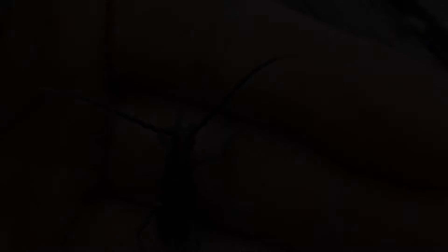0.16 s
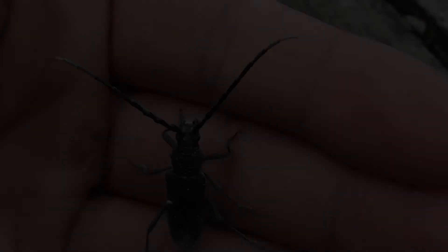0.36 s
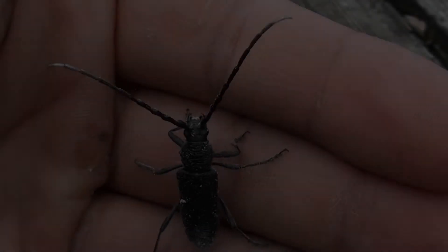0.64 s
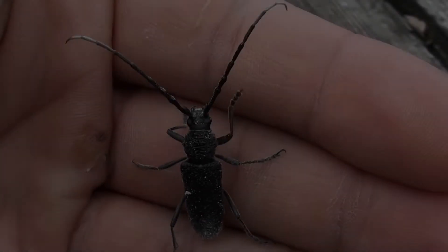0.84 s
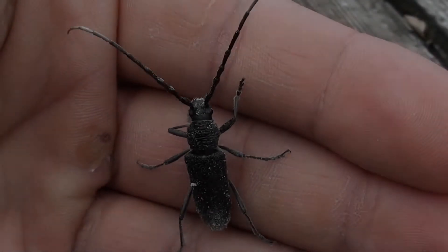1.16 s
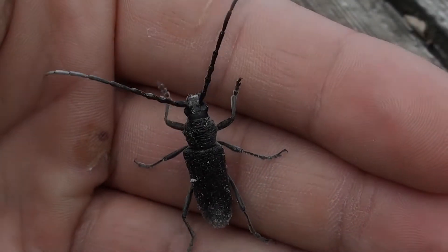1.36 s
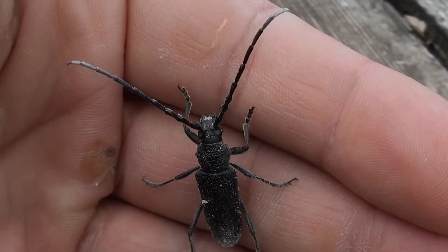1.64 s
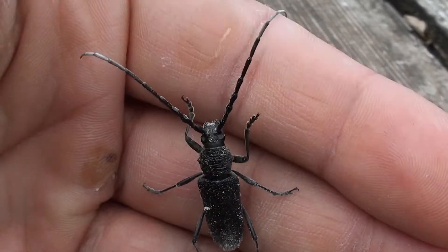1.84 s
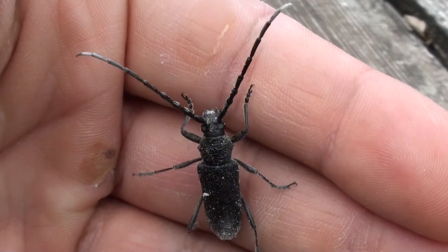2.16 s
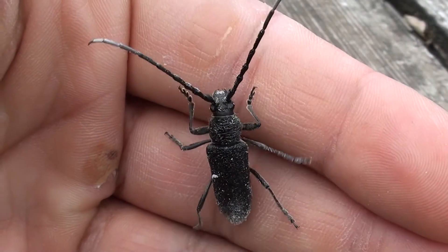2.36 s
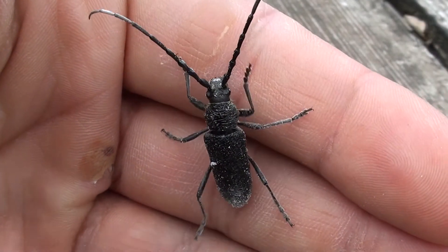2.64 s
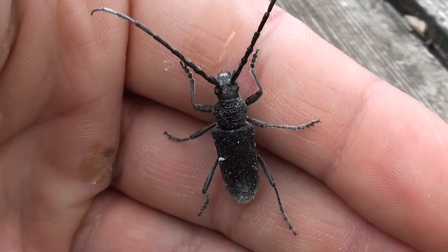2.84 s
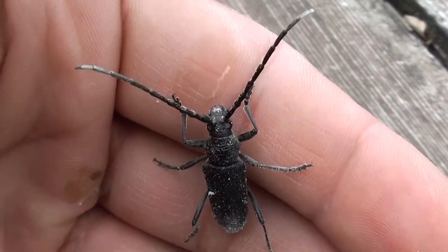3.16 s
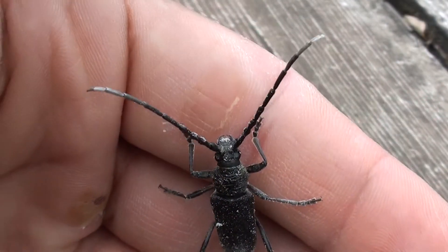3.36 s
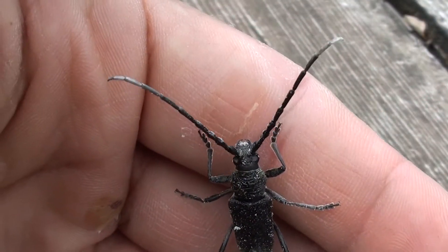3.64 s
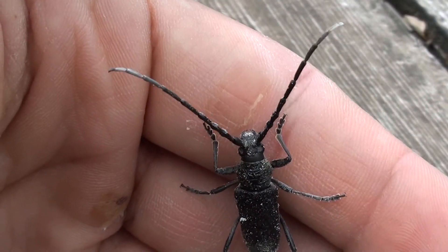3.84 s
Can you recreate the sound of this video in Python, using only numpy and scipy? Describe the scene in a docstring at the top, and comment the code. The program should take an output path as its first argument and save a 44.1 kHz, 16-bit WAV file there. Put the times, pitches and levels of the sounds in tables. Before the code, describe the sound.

Close, dry beetle stridulation fades in outdoors: rapid bright zipping squeaks in soft-loud pairs, a little slower and less regular midway, with distant bird whistles, steady low background noise and one faint hollow knock.

```python
"""The whole scene fades in together: a faint outdoor hush, far-off bird whistles and, close by, the squeaks
of a hand-held beetle. Hush: shaped stereo noise. Birds: gliding near-sines with a diffuse echo.
Beetle (stridulation): nodding draws a scraper over a file of ridges, a quiet slow back stroke, then a loud forward
stroke; each is a train of sharp ticks that speeds up and slows down, coloured by the body.
Later come one hollow knock (damped modes) and soft handling bumps (band-passed noise puffs)."""
import sys
import numpy as np
from scipy import signal
from scipy.fft import rfft, irfft
from scipy.io import wavfile

SR = 44100
rng = np.random.default_rng(int(sys.argv[2]) if len(sys.argv) > 2 else 0)


def bounce(signal):
    """Save signal as a 16-bit WAV file at the path given by the first command-line argument."""
    frames = np.transpose(np.atleast_2d(signal))
    limited = np.clip(frames, -1, 1)
    pcm = np.round(limited * 32767).astype(np.int16)
    wavfile.write(sys.argv[1], SR, pcm)


N = 176400
TIME = np.arange(N) / SR

# All levels are relative, ahead of the group gains and the fade.
# hush spectrum: (f/Hz, density level/dB)
HUSH_SPECTRUM = [(25, -20), (65, -7), (170, -1.5), (330, -2.5), (650, -1), (1000, -0.5), (1700, -4.5),
                 (3200, -5.5), (5000, -7.5), (8500, -14), (14500, -16.5), (16000, -17)]
# slow level of the low hush: (t/s, level/dB)
LOW_HUSH_LEVEL = [(0, -9.5), (.4, -1.5), (.65, -2), (1.0, -1.5), (1.6, -.5), (2.3, 1), (3.2, -.5), (4, 1.5)]
# likeness of the left and right hush: (f/Hz, left-right correlation)
EAR_CORRELATION = [(40, 0.81), (125, 1), (250, .55), (550, 0.5), (1100, 0.56), (2500, 0.74), (5000, 0.84),
                   (9000, 0.97), (14000, 1)]
HUSH_DB, HUSH_SPLIT_HZ = -51, 1800

# bird whistles: (t/s, duration/s, start f/Hz, middle f/Hz, end f/Hz, level/dB)
BIRD_WHISTLES = [(.12, 0.12, 2200, 2170, 2020, -57), (.22, 0.072, 3300, 3180, 3050, -50),
                 (.29, 0.138, 1970, 1858, 1870, -48), (0.273, 0.16, 2600, 2530, 2350, -52.5),
                 (.51, .07, 3115, 3370, 3530, -45.5), (.565, 0.05, 3585, 3625, 3590, -39.5),
                 (.67, .08, 3000, 2950, 2960, -48), (.81, 0.072, 3190, 3357, 3650, -44),
                 (.855, 0.076, 3600, 3677, 3620, -44.5), (.98, .10, 3020, 2953, 2940, -45.5),
                 (1.045, 0.044, 2994, 3490, 3100, -50), (1.12, 0.08, 3163, 3410, 3550, -45.5),
                 (1.17, 0.066, 3530, 3670, 3575, -40.5), (1.28, 0.11, 2980, 2947, 2930, -47),
                 (1.52, 0.086, 2097, 2074, 2080, -53.5), (1.65, 0.041, 1933, 1883, 1790, -53),
                 (1.89, 0.14, 2173, 2206, 2283, -53), (2.90, 0.098, 2650, 2935, 3520, -60),
                 (3.57, 0.034, 2045, 2065, 2120, -57), (3.63, 0.037, 2150, 2160, 2120, -53),
                 (3.72, 0.072, 2270, 2480, 2284, -44), (3.78, 0.096, 2332, 2310, 2237, -47),
                 (3.955, 0.073, 2280, 2200, 2210, -49.5)]
# a second bird's quick upward chirps: (t/s, duration/s, start f/Hz, end f/Hz, level/dB)
BIRD_CHIRPS = [(0.68, 0.015, 4860, 5500, -49), (0.696, .02, 4520, 4860, -50),
               (0.753, 0.02, 4650, 5070, -53), (1.023, .025, 4500, 5150, -55),
               (2.434, 0.028, 3700, 4840, -52), (2.529, 0.033, 3690, 4950, -52),
               (2.564, .03, 5100, 6500, -55), (2.598, .014, 4700, 5460, -52),
               (2.633, .03, 3690, 5000, -50.5), (2.666, .03, 5100, 6500, -57),
               (2.74, 0.04, 3680, 5030, -54), (2.766, .03, 5100, 6630, -54.5),
               (2.803, 0.015, 4720, 5500, -54), (2.833, 0.023, 3790, 4800, -47),
               (2.856, .03, 5100, 6490, -52), (2.908, 0.015, 4700, 5500, -58),
               (2.941, 0.023, 3640, 4800, -49.5), (2.963, .03, 5100, 6500, -56),
               (3.008, .014, 4730, 5500, -68), (3.045, 0.017, 3700, 4800, -53),
               (3.07, .03, 5100, 6500, -59)]
BIRD_WAVER, BIRD_FLUTTER_DB = .019, 3.2   # scatter of pitch (share) and of level
BIRD_DRAWS_PER_S = 300                    # random points per second of waver and flutter
BIRDS_DB, ECHO_DB, ECHO_SIDE_DB, ECHO_T60_S = -1.5, -2.5, -7, .5

# back strokes of the scraper: (t/s, duration/s, top tick rate f/Hz, time to top rate/s,
#   braking exponent: higher brakes later, level/dB, shell resonance/dB, low partials/dB)
BACK_STROKE_EVENTS = [(.245, 0.077, 1130, 0.039, 2, -32.5, 0, 0),
                      (.487, .113, 853, 0.069, 1.9, -32.5, 0, 5.5),
                      (.783, 0.1, 966, 0.063, 3.4, -33.5, -1.5, 5),
                      (1.122, 0.076, 975, .010, 5.3, -32, 0.5, 4),
                      (1.399, 0.094, 978, 0.057, 2.4, -35.5, 1.5, 3),
                      (1.756, .036, 629, 0.011, 2.1, -35.5, -2, 7.5),
                      (1.790, 0.07, 1023, 0.029, 2.5, -31.5, 2.5, 3),
                      (1.9902, 0.052, 1540, 0.033, 3.5, -27.5, 5, -6.5),
                      (2.254, 0.1, 661, 0.064, 2.2, -32, 1, -6.5),
                      (2.555, 0.062, 616, 0.038, 5, -35.5, -3, 5),
                      (2.612, 0.072, 483, 0.031, 4, -34.5, 3, 6.5),
                      (2.761, .040, 392, 0.0073, 1.84, -35, -7, 7.5),
                      (2.867, .080, 432, .040, 2, -33, -8, -1), (2.957, 0.042, 228, .015, 3, -29.5, -5, -3),
                      (3.013, 0.092, 706, 0.052, 2.7, -36, -2, 3),
                      (3.356, 0.089, 677, 0.0043, 5.5, -31.5, -2, -4.5),
                      (3.610, 0.026, 737, 0.007, 4, -36.5, 3, 6),
                      (3.638, 0.1, 800, 0.032, 1.9, -33.5, 2.5, 0),
                      (3.968, .080, 650, 0.01, 2.7, -36, 1, 1)]
# forward strokes: same columns
FORWARD_STROKE_EVENTS = [(0.3274, .095, 1144, 0.016, 3.7, -22, -5.5, 0.5),
                         (0.613, 0.069, 1244, 0.021, 2.6, -23, -3.5, 2),
                         (0.896, 0.074, 1222, 0.02, 2.7, -21.5, -6, 1.5),
                         (1.2084, 0.091, 1156, 0.015, 3.3, -22, -6.5, 0),
                         (1.5099, 0.093, 1235, .018, 1.6, -22, -6, -0.5),
                         (1.8694, 0.073, 1257, 0.018, 1.87, -26, 5, 4.5),
                         (2.3695, 0.063, 1554, 0.019, 1.54, -28.5, 7, 6),
                         (2.7037, 0.062, 1630, .023, 2.8, -25.5, 0, 3.5),
                         (3.117, 0.069, 1314, 0.033, 3.1, -22.5, -2, -1.5),
                         (3.4602, 0.074, 1430, .028, 2.2, -21.5, -2, -2),
                         (3.751, 0.076, 1361, 0.022, 2.5, -21, -1, -1.5)]
# the scraper catches on the file: (t/s, level/dB)
SCRAPER_CATCHES = [(.485, -31), (.784, -32), (1.122, -25), (1.125, -32), (1.386, -36), (1.7448, -26.5),
                   (2.536, -31), (2.819, -31.5), (3.356, -27.5), (3.599, -27.5)]
# scatter of back ticks, before skimming: (share of the stroke, share of a ridge spacing)
BACK_SCATTER = [(0, .06), (.55, .032), (1, .05)]
# scatter of forward ticks, even under pressure and ragged while braking: same columns
FORWARD_SCATTER = [(0, .014), (.2, .006), (.45, .008), (.66, .033), (1, .04)]
# scraper pressure along a back stroke: (share of the stroke, level/dB)
BACK_FORCE = [(0, -0.5), (.3, 0), (.55, 0), (.8, -1.5), (1, -3)]
# scraper pressure along a forward stroke: same columns
FORWARD_FORCE = [(0, 1), (.14, 2.5), (.38, 2.5), (.55, -1), (.75, -2), (1, -4)]
# colour of one back tick: (f/Hz, level/dB)
BACK_COLOUR = [(1000, -41.5), (2300, -8), (3400, -3.5), (5000, -6), (5900, 4), (7000, -1.5), (8500, 2),
               (10000, -2.5), (11200, -4), (12600, -4.5), (14200, -11), (15800, -11)]
# colour of one forward tick: (f/Hz, level/dB)
FORWARD_COLOUR = [(1000, -49), (1900, -18), (2400, -12), (2900, -6.5), (3600, -5.5), (4400, -9.5),
                  (5200, -6.5), (6050, 0.5), (6850, -4.5), (8400, 3), (10000, 2.5), (11000, -1.5),
                  (12200, 0), (13800, -7.5), (15800, -10)]
FORWARD_START_HZ, BACK_START_HZ = 638, 402.5   # first tick rates, capped at the top rate
END_SPEED = .3                                 # last rate as a share of the top rate
SPEED_WOBBLE, WOBBLES_PER_S = .014, 260        # share of the rate; random points per second
SKIM_HZ, SKIM_JITTER = 1750, 9   # near this tick rate the scraper skims: weaker ticks, more scatter
SHELL_HZ, SHELL_WIDTH_HZ, LOW_EDGE_HZ = 9760, 2500, 6100
RING_S, RING_DB = 0.001, -14     # decay constant and level of the body's ring after each tick
FORWARD_DB, BACK_DB = 8.5, 6.5   # group gains; catches share the forward one

# modes of the knocked body: (f/Hz, peak level/dB, t60/s)
KNOCK_BODY_MODES = [(768, -45, 0.11), (1000, -51, 0.066), (1260, -47, 0.057), (1600, -42.5, 0.047)]
KNOCK_S, KNOCK_SWELL_S = 2.287, 0.0057   # onset; time for the contact to peak

# soft handling bumps: (time halfway up the rise t/s, f/Hz, level/dB)
HANDLING_BUMPS = [(2.522, 340, -52), (2.543, 270, -69), (2.64, 80, -60), (3.075, 70, -61.5)]
BUMP_S = 0.0135                          # rise time, also the decay constant

# fade of the whole scene: (t/s, level/dB)
FADE_IN_LEVEL = [(0, -80), (.1, -48.5), (.2, -35), (.33, -26.5), (.46, -19.5), (.73, -10.5), (1.05, -5.5),
                 (1.35, -3), (1.75, -1.5)]
CUTOFF_HZ = 15900


def from_db(db):
    """Level to amplitude: 20 dB is a factor of ten."""
    return 10 ** (np.asarray(db) / 20)


def along(rows, at):
    """Linear interpolation of a two-column curve."""
    return np.interp(at, *np.transpose(rows))


def at_hz(rows, hz):
    """Interpolation of a spectrum on a logarithmic frequency axis."""
    f, v = np.transpose(rows)
    return np.interp(np.log(hz + 1), np.log(f), v)


def add(out, s, x):
    """Superposition: sum x into out from time s."""
    i = max(int(s * SR), 0)
    out[i:i + len(x)] += x[:max(N - i, 0)]


def hush():
    """Partial coherence: mid and side noise mixed by correlation make far-off hush wide in the middle range."""
    hz = np.fft.rfftfreq(N, 1 / SR)
    gain = from_db(at_hz(HUSH_SPECTRUM, hz)) * (hz < CUTOFF_HZ)
    gain /= np.sqrt(np.mean(gain ** 2))
    alike = np.clip(at_hz(EAR_CORRELATION, hz), 0, 1)
    mid, side = rfft(rng.standard_normal((2, N)))
    shared = np.sqrt((1 + alike) / 2) * mid
    opposed = np.sqrt((1 - alike) / 2) * side * [[1], [-1]]
    both = gain * (shared + opposed)
    low_share = 1 / (1 + (hz / HUSH_SPLIT_HZ) ** 4)
    low = irfft(both * low_share, N) * from_db(along(LOW_HUSH_LEVEL, TIME))
    high = irfft(both * (1 - low_share), N)
    return from_db(HUSH_DB) * (low + high)


def note(length, pitches, db):
    """Frequency modulation: phase integrates a polynomial glide with random waver; the level flutters."""
    u = np.linspace(0, 1, int(length * SR))
    draw_times = np.arange(100) / BIRD_DRAWS_PER_S
    waver, flutter = (np.interp(u * length, draw_times, c) for c in rng.standard_normal((2, 100)))
    glide = np.polyfit(np.linspace(0, 1, len(pitches)), pitches, len(pitches) - 1)
    hz = np.polyval(glide, u) * (1 + BIRD_WAVER * waver)
    envelope = np.sqrt(2 * np.abs(np.sin(np.pi * u)))
    level = from_db(db + BIRD_FLUTTER_DB * flutter)
    return level * envelope * np.sin(2 * np.pi * np.cumsum(hz) / SR)


def birds():
    """Diffuse reflection: whistles and chirps convolved with a decaying noise echo for each side."""
    out = np.zeros(N)
    for s, length, start, middle, end, db in BIRD_WHISTLES:
        add(out, s, note(length, (start, middle, end), db))
    for s, length, start, end, db in BIRD_CHIRPS:
        add(out, s, note(length, (start, end), db))
    mid, side = rng.standard_normal((2, SR)) * from_db(-60 * TIME[:SR] / ECHO_T60_S)
    echo = mid + from_db(ECHO_SIDE_DB) * side * [[1], [-1]]
    echo /= np.linalg.norm(echo, axis=1, keepdims=True)
    reflected = signal.fftconvolve(out[None], echo, axes=1)[:, :N]
    return from_db(BIRDS_DB) * (out + from_db(ECHO_DB) * reflected)


def tick(colour, shell_db, low_db, size=512):
    """Minimum phase: folding the cepstrum gives one ridge strike a causal pulse with the body's colour."""
    hz = np.fft.rfftfreq(size, 1 / SR)
    shell = shell_db * np.exp(-((hz - SHELL_HZ) / SHELL_WIDTH_HZ) ** 2)
    low = low_db / (1 + (hz / LOW_EDGE_HZ) ** 8)
    db = at_hz(colour, hz) + shell + low
    cepstrum = irfft(np.log(from_db(db)))
    cepstrum[1:size // 2] *= 2
    cepstrum[size // 2 + 1:] = 0
    return irfft(np.exp(rfft(cepstrum)))


def ring(size=160):
    """High modal density: many overlapping modes act as a short decaying noise, here of unit energy."""
    t = np.arange(size) / SR
    x = rng.standard_normal(size) * np.exp(-t / RING_S) * (1 - np.exp(-4 * t / RING_S))
    return x / np.linalg.norm(x)


def stroke(row, pressure, colour, jitter, start_hz, push, uneven_db, grit_db, size=8):
    """Stridulation: the scraper speeds up, then brakes; each ridge crossed gives a tick and a trace of grit."""
    _, length, top_hz, rise, hold, level_db, shell_db, low_db = row
    t = np.arange(int(length * SR)) / SR
    speeding_up = (1 - min(start_hz / top_hz, 1)) * np.clip(1 - t / rise, 0, 1) ** push
    braking = (1 - END_SPEED) * np.clip((t - rise) / max(length - rise, .005), 0, 1) ** hold
    rate = top_hz * (1 - speeding_up - braking)
    rate *= 1 + SPEED_WOBBLE * np.interp(t * WOBBLES_PER_S, np.arange(64), rng.standard_normal(64))

    # a tick falls wherever the count of ridges passed reaches a whole number, give or take the scatter
    ridges = np.cumsum(rate) / SR
    count = min(int(ridges[-1]) + 1, 256)
    ridge = np.arange(count)
    chance = rng.standard_normal((256, 2))[:count]
    scatter = along(jitter, t / length) * (1 + SKIM_JITTER * (rate / SKIM_HZ) ** 12)
    when = np.interp(ridge + np.interp(ridge, ridges, scatter) * chance[:, 0], ridges, t)
    force = from_db(level_db + along(pressure, when / length) + uneven_db * chance[:, 1])
    force /= np.sqrt(1 + (np.interp(when, t, rate) / SKIM_HZ) ** 8)

    # sinc pulses place the ticks between samples
    place = when * SR + size
    taps = place.astype(int)[:, None] + np.arange(-size, size + 1)
    pulses = force[:, None] * np.sinc(taps - place[:, None])
    clicks = np.bincount(taps.ravel(), pulses.ravel())

    body = np.convolve(clicks, ring())
    grit_envelope = np.sqrt(np.convolve(clicks ** 2, ring() ** 2))
    grit = grit_envelope * rng.standard_normal(SR // 2)[:len(body)]
    x = from_db(RING_DB) * body + from_db(grit_db) * grit
    x[:len(clicks)] += clicks
    return np.convolve(x, tick(colour, shell_db, low_db))[size:]   # drop the sinc lead-in


def beetle():
    """Superposed friction sources: back strokes, forward squeaks and the catches of the scraper."""
    out = np.zeros(N)
    for row in BACK_STROKE_EVENTS:
        x = stroke(row, BACK_FORCE, BACK_COLOUR, BACK_SCATTER, BACK_START_HZ,
                   push=1.3, uneven_db=1.5, grit_db=-10.5)
        add(out, row[0], from_db(BACK_DB) * x)
    for row in FORWARD_STROKE_EVENTS:
        x = stroke(row, FORWARD_FORCE, FORWARD_COLOUR, FORWARD_SCATTER, FORWARD_START_HZ,
                   push=2.0, uneven_db=1.0, grit_db=-15)
        add(out, row[0], from_db(FORWARD_DB) * x)
    for s, db in SCRAPER_CATCHES:
        add(out, s, from_db(db + FORWARD_DB) * np.convolve(ring(), tick(BACK_COLOUR, 0, 0)))
    return out


def knock():
    """Modal excitation: a brief rough contact shakes a few damped modes into one faint hollow knock."""
    out, t = np.zeros(N), TIME[:SR // 4]
    contact = rng.standard_normal(len(t)) * t * np.exp(-t / KNOCK_SWELL_S)
    for hz, db, t60 in KNOCK_BODY_MODES:
        mode = np.sin(2 * np.pi * hz * t) * from_db(-60 * t / t60)
        x = signal.fftconvolve(contact, mode)
        add(out, KNOCK_S, from_db(db) * x / np.abs(x).max())
    return out


def bumps():
    """Band-limited transients: short dull puffs of filtered noise as the hand shifts."""
    out, t = np.zeros(N), TIME[:SR // 4]
    envelope = t / BUMP_S * np.exp(1 - t / BUMP_S)
    for s, hz, db in HANDLING_BUMPS:
        band = signal.butter(2, [hz * 0.61, hz * 1.46], "band", fs=SR, output="sos")
        x = signal.sosfilt(band, rng.standard_normal(SR))[-len(t):]   # skip the filter's settling
        add(out, s - BUMP_S / 2, from_db(db) * x / x.std() * envelope)
    return out


def scene():
    """Linear superposition: beetle, knock and bumps centred, with the birds' echo and the hush spread wide."""
    return hush() + birds() + beetle() + knock() + bumps()


def record(dry):
    """Gain and low-pass filtering: the scene fades in and its top is cut steeply."""
    low_pass = signal.ellip(10, .1, 70, CUTOFF_HZ, fs=SR, output="sos")
    return signal.sosfilt(low_pass, dry * from_db(along(FADE_IN_LEVEL, TIME)))


dry = scene()
out = record(dry)
bounce(out)
```